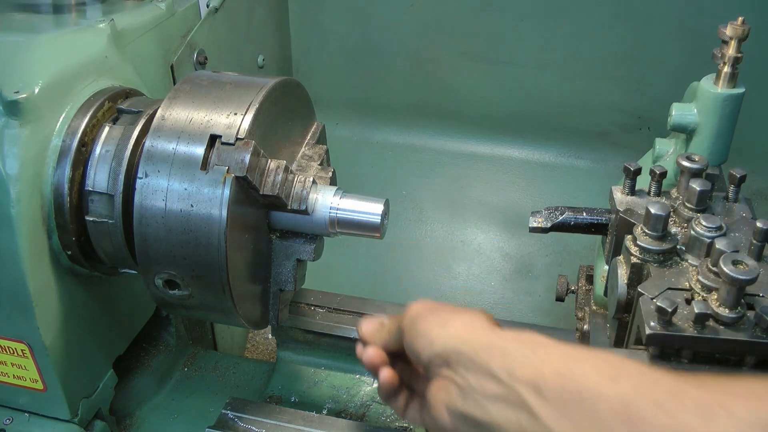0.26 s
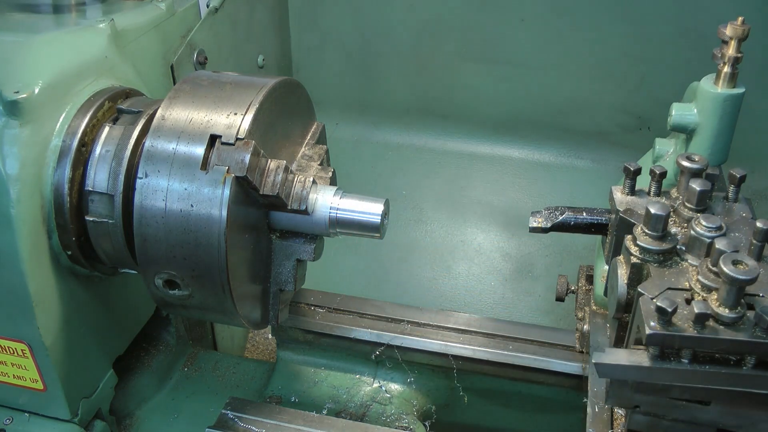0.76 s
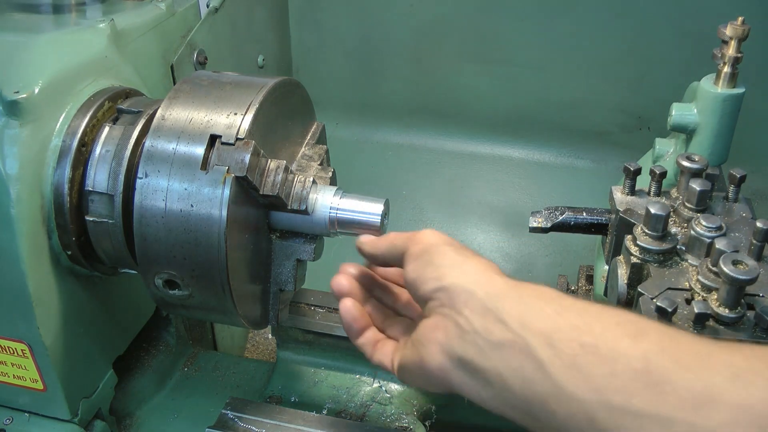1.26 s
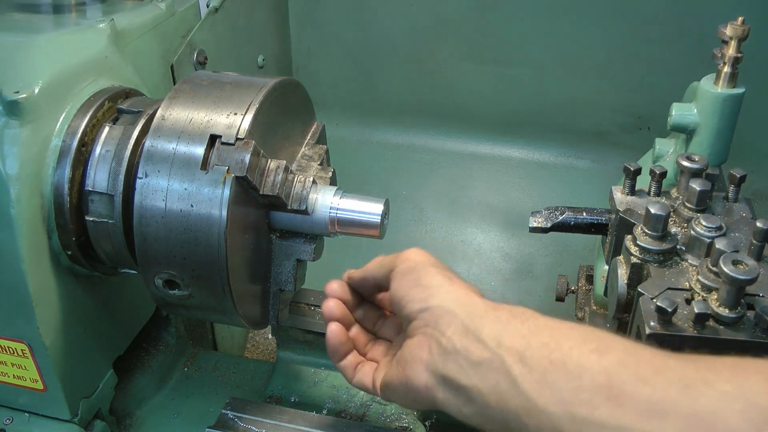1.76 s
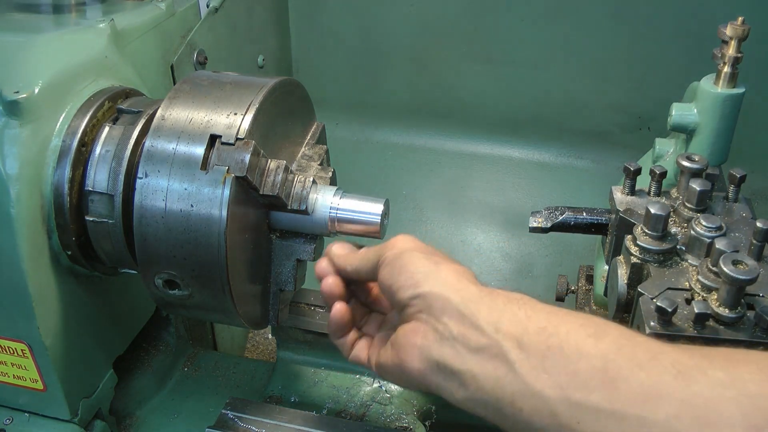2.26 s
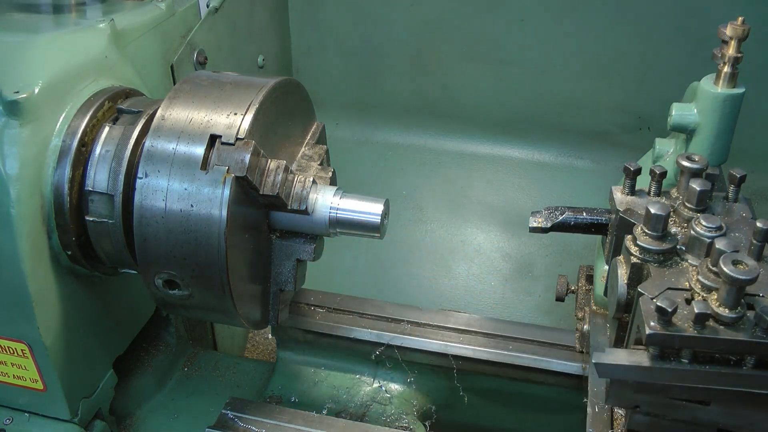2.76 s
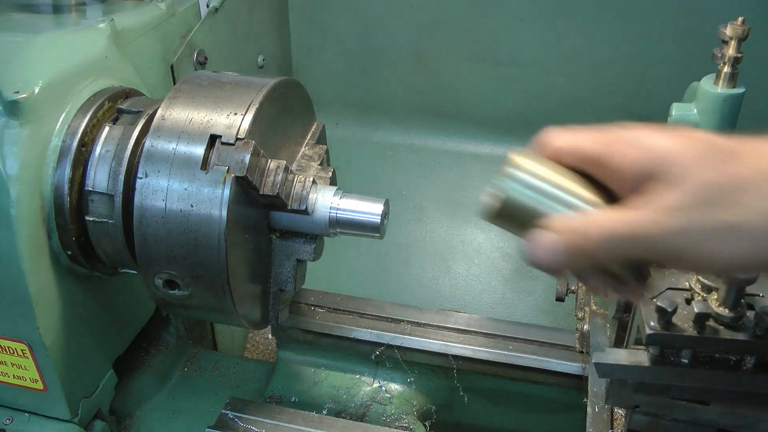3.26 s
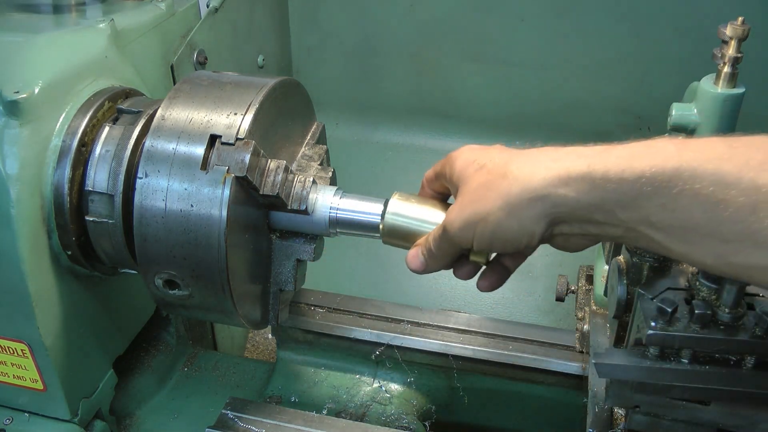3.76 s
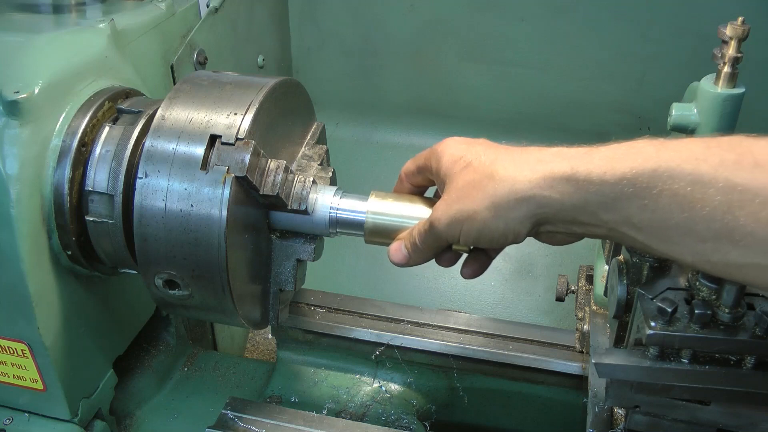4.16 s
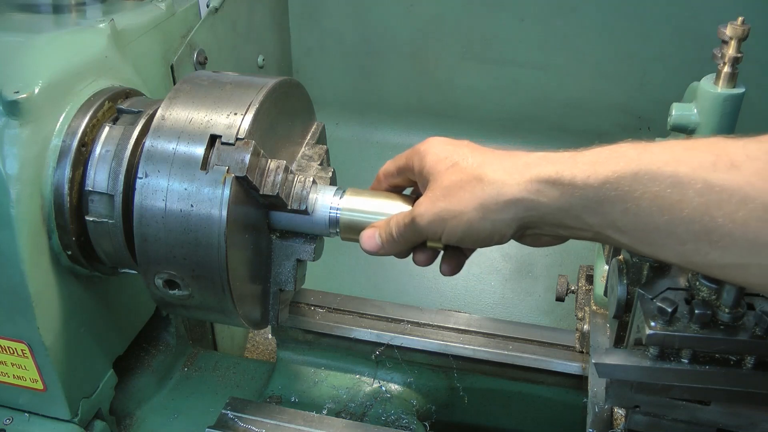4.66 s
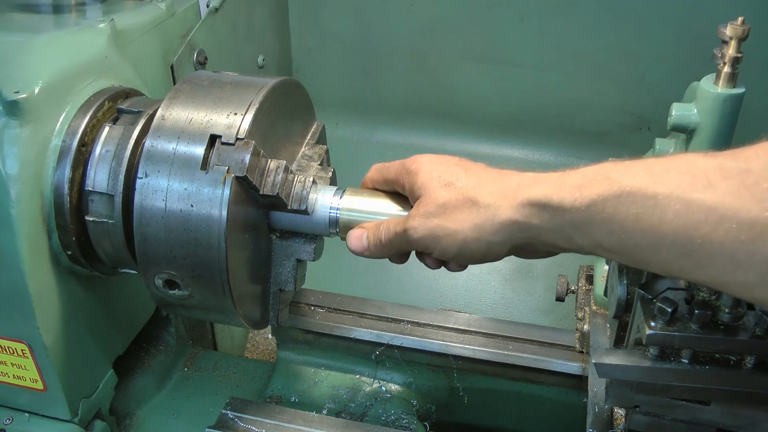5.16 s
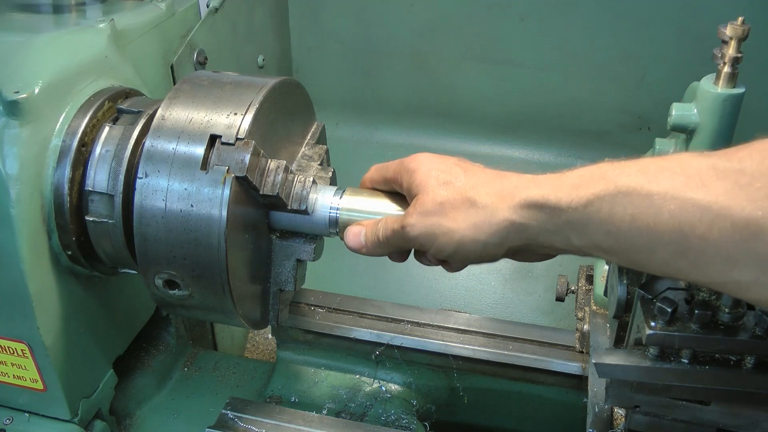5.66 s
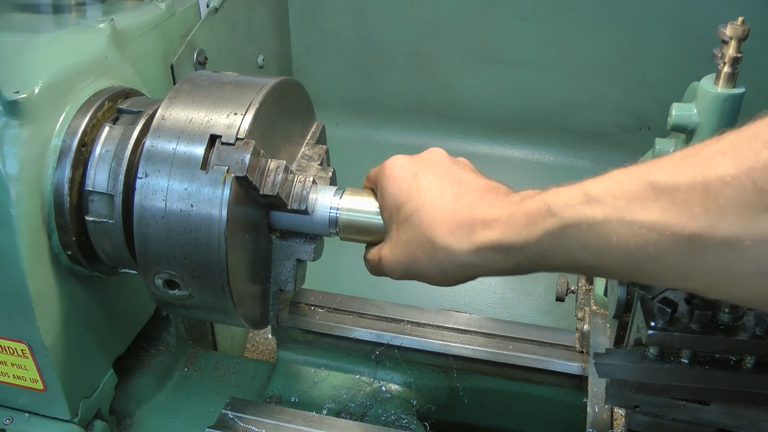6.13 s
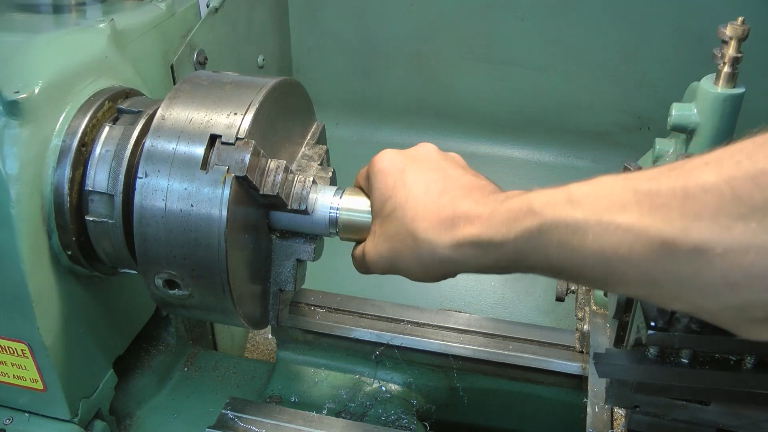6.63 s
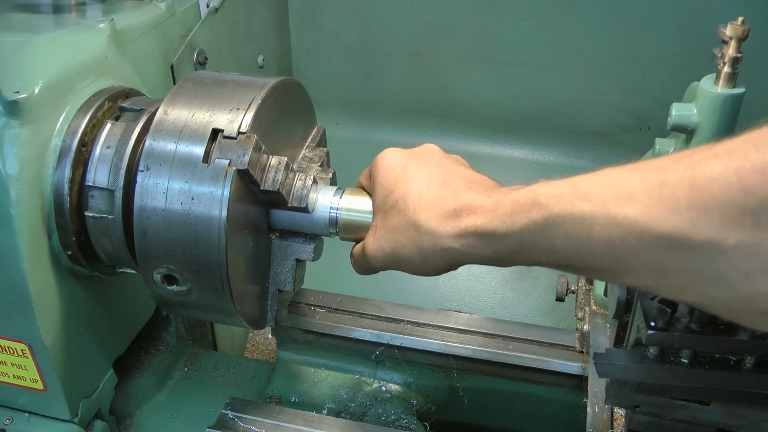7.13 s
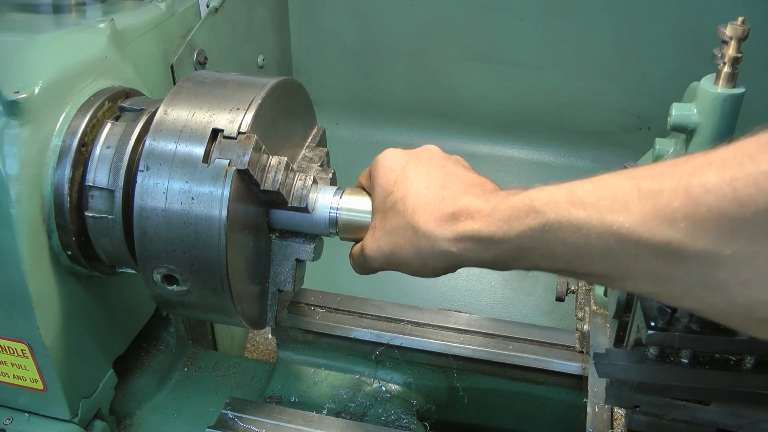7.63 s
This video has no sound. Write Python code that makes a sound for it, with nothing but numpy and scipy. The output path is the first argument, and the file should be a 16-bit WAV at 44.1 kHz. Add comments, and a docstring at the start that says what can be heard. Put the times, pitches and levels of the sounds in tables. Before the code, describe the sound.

In a small workshop with faint mains hum, a blower rushes loudly with a tonal whirr, is switched off near two seconds and sinks in pitch, leaving airy hiss. A brass sleeve then scrapes and knocks on a steel taper in a lathe chuck, is twisted with dry swishes and ticks, and snaps home with a hard clack and low thump. Close stereo microphone, brighter and louder on the right.

```python
"""Mains hum swells in under a small workshop; a blower rushes, is switched off and coasts down, leaving a hiss.
Then a brass sleeve knocks and scrapes on a steel taper held in a lathe chuck, and is twisted with swishes and
ticks. One hard clack shoves it home and thumps the lathe; small twists and ticks follow.
Coloured noise makes air and friction, decaying sines the struck metal, speed-driven harmonics the blower."""
import sys
import numpy as np
from scipy import signal
from scipy.fft import rfft, irfft, next_fast_len
from scipy.io import wavfile
from scipy.ndimage import uniform_filter1d

SR = 44100
rng = np.random.default_rng(int(sys.argv[2]) if len(sys.argv) > 2 else 0)


def dump_mix(stems):
    """Bounce the given channels to the path in sys.argv[1] as a 16-bit WAV at rate SR."""
    frames = np.atleast_2d(stems).T  # one column per channel
    limited = np.clip(frames, -1, 1)  # hard clip at full scale
    pcm = np.round(limited * 32767).astype(np.int16)
    wavfile.write(sys.argv[1], SR, pcm)


N = 348157
T = np.arange(N) / SR

# Mains hum: multiple_of_hum_hz, level_db
HUM_HARMONICS = [(1, -67), (2, -55), (3, -51.5), (4, -61)]
HUM_HZ, HUM_SWELL_S = 99.85, 1  # swell: time constant of hum and room noise
# Room noise spectrum: freq_hz, level_db_per_hz
ROOM_SPECTRUM = [(25, -11), (60, -4), (110, 2.5), (250, 2), (400, 1.5), (600, -2.5), (780, -5),
                 (980, -12.5), (1350, -10), (1800, -3), (3400, -7), (4600, -2.5), (6500, -8),
                 (10400, -11.5), (16000, -14.5)]

# Blower tones: multiple_of_shaft_hz, level_db, speed_power
BLOWER_TONES = [(1, -32, 1), (4, -20.5, 1), (11, -36, 1), (18, -13, 0.64), (20, -16, 5.5)]
# Rush of air: freq_hz, level_db_per_hz
RUSH_SPECTRUM = [(30, -11), (100, -20), (200, -13.5), (300, -7), (450, -6), (680, -2), (1000, -1),
                 (1650, -2.5), (2400, 0.5), (4500, -3.5), (7500, -9.5), (10000, -15), (12500, -26),
                 (16000, -42)]
# Duct resonances: freq_hz, width_hz, gain_db
DUCT_PEAKS = [(738, 35, 10), (833, 63, 10), (1096, 30, 9.5), (1221, 68, 9), (1410, 84, 8), (1460, 32, 8),
              (1710, 37, 5), (2340, 160, 4.5)]
# Outlet hiss: freq_hz, level_db_per_hz
JET_SPECTRUM = [(1000, -18), (2500, -6), (3300, -8.5), (3800, -4), (4450, -5.5), (5300, -7.5), (7500, -10),
                (11000, -28.5)]
# Outlet hiss against the rush: time_s, level_db
JET_LEVEL = [(0, -3.5), (1.0, -5.5), (1.6, -2), (1.92, -6.5), (2.15, -17)]
# Mount and housing, which the sinking tones pass through: freq_hz, width_hz, gain_db
HOUSING_PEAKS = [(86, 14.4, 14.5), (1295, 130, 15), (1160, 99, 8)]
# Breathy whistles in the airflow: start_s, length_s, start_hz, end_hz, half_width_hz, level_db
AIR_WHISTLES = [(0.74, 0.8, 2356, 2343, 90, -41), (1.2, 0.76, 821, 838, 22.1, -38),
                (1.45, 0.71, 1222, 1233, 30, -42.5), (1.3, 0.59, 3226, 3180, 100, -39),
                (1.36, 0.55, 4410, 4540, 300, -36), (2.315, 0.29, 3190, 3240, 115, -33),
                (2.385, 0.17, 3695, 4410, 700, -33)]
BLOWER_FULL_S, BLOWER_OFF_S, COAST_S = 0.44, 1.96, 1.58  # COAST_S: time constant of the speed
BLOWER_DB, SWELL_DB_PER_S, CREEP_DB_PER_S = -30.5, 17, 2.5
SHAFT_HZ, RUSH_SPEED_POWER = 99.6, 2.32
COAST_FLUTTER_SHARE = 0.018  # share by which the pitch flutters as the speed nears zero

# Lingering hiss: freq_hz, level_db_per_hz
HISS_SPECTRUM = [(35, -25), (110, -6), (200, -6.5), (350, 6.5), (600, -3.5), (1100, -7), (1550, -7.5),
                 (2100, 0.5), (2900, -1), (3750, 2), (4500, 2), (7400, -0.5), (9500, -9), (16000, -11)]
HISS_FULL_S, HISS_HOLD_S, HISS_ATTACK_S, HISS_T60_S, HISS_DB = 2.584, 1.16, 0.31, 3, -34.5

# Sleeve on taper: start_s, length_s, grating_db, body_db, sleeve_db
SCRAPE_PUSHES = [(3.96, 0.014, -74, -40, -58), (4.09, 0.063, -48, -40, -58), (4.17, 0.024, -42.5, -41, -59),
                 (4.235, 0.06, -46, -45, -50), (4.32, 0.033, -46, -42, -48), (4.52, .05, -46, -45, -59),
                 (4.6, 0.017, -28.5, -28, -40), (4.655, 0.085, -31, -32, -46.5),
                 (4.735, 0.022, -35, -42, -58), (5.735, 0.015, -53, -37, -80)]
# Grating noise: freq_hz, level_db_per_hz
GRATE_SPECTRUM = [(100, -22), (800, 9), (1200, -6), (1700, 8), (2200, 16), (2850, 14), (3250, 4),
                  (3900, -3), (5200, -10), (7500, -6), (10000, -33), (16000, -34)]
SCRAPE_ATTACK_S, GRATE_T60_S, RUMBLE_T60_S = 0.019, 0.066, 0.43

# Sleeve knocks: start_s, level_db, contact_pitch_hz, contact_lowpass_hz, body_db, sleeve_db
TAPER_KNOCKS = [(4.0267, -14, 2200, 2980, -10, -13.5), (4.1963, -33, 2080, 4000, -0.5, -3),
                (4.5066, -39, 1680, 3000, 6, -28), (4.5715, -26, 2950, 9000, -9, -25),
                (4.5761, -29.5, 2420, 9000, 6, -24), (4.593, -37, 1900, 6000, 8, -14),
                (4.6248, -21, 2360, 11000, -10, -5.5), (4.6315, -26.5, 2250, 9000, -2, -17),
                (4.66, -33, 2870, 7000, -12, -22), (4.6772, -35, 2370, 9000, 4, -11),
                (4.7089, -11.5, 1740, 2600, -13, -32), (4.7122, -17, 1750, 3000, -12, -26),
                (4.7229, -24, 2120, 2200, -6, -28), (4.738, -26.5, 2010, 2600, -1.5, -30)]
# Chuck, taper and sleeve together: freq_hz, level_db, t60_s
METAL_MODES = [(814, -5, 0.2), (1124, -5, 0.18), (1444, -6, 0.24), (1715, 7, 0.098), (1820, -3.5, 0.19),
               (1980, -1, 0.22), (2050, -13, 0.19), (2055, -5, 0.31), (2030, -6, 0.27), (2180, 6, 0.14),
               (2520, -14, 0.17), (2900, -3, 0.13), (2970, -6, 0.14), (3230, -11, 0.1), (3500, -12, 0.099),
               (4460, -23, 0.14)]
# Sleeve alone, damped by the fingers: freq_hz, level_db, t60_s
SLEEVE_MODES = [(6800, 8, 0.21), (6880, 7, 0.17), (7400, 1, 0.1), (7750, -6, 0.021)]
# Crack of a knock: freq_hz, level_db_per_hz
CRACK_SPECTRUM = [(60, -40), (200, -44), (780, 0), (1100, -3), (1500, 1), (1900, 13.5), (2550, 3),
                  (3000, 2.5), (4000, -0.5), (5200, -12), (7500, -2), (10000, -19), (16000, -33)]
# Lathe body noise: freq_hz, level_db_per_hz
BODY_SPECTRUM = [(50, -13), (110, -9.5), (170, -5), (270, 5), (420, 1), (520, 3.5), (760, -13.5),
                 (1000, -12.5), (3000, -32)]
# Lathe casting resonances: freq_hz, width_hz, gain_db
CASTING_PEAKS = [(159, 7.9, 16.5), (201.8, 11, 14.5), (239, 20, 6), (279, 16, 10.5), (369.5, 24, 16.5),
                 (447.7, 18, 15), (493, 14, 2), (623, 11, 14), (787, 46, 15)]
CONTACT_WIDTH_HZ, CONTACT_DB = 450, 8  # how strongly a knock favours the modes near its pitch
CLINK_DB, CLINK_T60_S = 3, 0.031

# Palm on brass: start_s, length_s, level_db
PALM_RUBS = [(5.68, 0.049, -41.5), (5.97, 0.055, -37.5), (6.1, 0.1, -41.5), (6.25, 0.075, -41.5),
             (6.42, 0.01, -45), (6.462, 0.016, -36), (6.57, 0.26, -44), (7.66, 0.27, -52.5)]
# Rubbing friction: freq_hz, level_db_per_hz
RUB_SPECTRUM = [(300, -5), (700, -4.5), (1200, -8.5), (2150, 5), (3200, 2.5), (4200, 3), (5200, 1),
                (7000, -3), (10000, -10), (16000, -11)]
# Sleeve twists: start_s, length_s, start_hz, climb_octaves, level_db
SLEEVE_TWISTS = [(4.923, .05, 6300, 0.05, -51), (4.986, 0.07, 5640, 0.35, -48.5),
                 (5.157, 0.098, 5600, 0.077, -51), (5.23, 0.082, 5500, 0.58, -47),
                 (5.383, 0.086, 5860, 0.12, -50.5), (5.486, 0.091, 5920, 0.39, -45),
                 (5.762, 0.095, 5800, 0.7, -46), (5.817, 0.17, 10280, 0.032, -54),
                 (6.035, 0.1, 5560, 0.88, -45.5), (6.13, 0.082, 10200, 0.047, -55),
                 (6.413, .04, 6400, 0.15, -46), (6.445, 0.053, 7530, 0.42, -38),
                 (6.662, .07, 7130, 0.31, -46), (6.915, 0.081, 5540, 0.098, -46),
                 (7.172, 0.097, 5640, 0.47, -50), (7.373, 0.075, 6060, 0.89, -46),
                 (7.558, 0.11, 6350, 0.46, -46.5), (7.798, 0.093, 8230, .35, -52)]
# Squeaks of brass on steel: start_s, length_s, start_hz, end_hz, half_width_hz, level_db
BRASS_SQUEAKS = [(4.335, 0.07, 1110, 1070, 40, -49.5), (5.0, 0.085, 4470, 4540, 109, -48.5),
                 (5.25, 0.1, 4450, 4650, 120, -50), (5.5, 0.1, 4650, 4500, 180, -48.5),
                 (6.438, 0.036, 2170, 2560, 220, -38), (6.445, 0.078, 4150, 4400, 130, -40),
                 (6.514, 0.024, 3750, 4450, 300, -39), (6.527, 0.033, 5250, 5900, 350, -45),
                 (6.955, 0.05, 4500, 4600, 160, -50), (7.602, 0.11, 4600, 4520, 150, -51)]
# Hollow between sleeve and palm: freq_hz, width_hz, gain_db
HOLLOW_PEAKS = [(2040, 810, -3), (2850, 360, 1.5), (4630, 320, 3.5), (6100, 630, 6.5), (6870, 500, 3),
                (10400, 510, 3.5)]
RUB_ATTACK_S, RUB_T60_S = 0.056, 0.37
GRIP_FROM_S, GRIP_DB = 3.9, -51  # faint rustle of the closed hand
TWIST_HALF_WIDTH_HZ, SIZZLE_LAG_S = 1100, 0.021
CATCHES_PER_S, CATCH_POWER_SHARE = 900, 0.26  # catches of skin in the rubbing

# Slips under the grip: start_s, level_db, low_hz, high_hz, t60_s, snap_db, body_db, ring_db
GRIP_TICKS = [(5.493, -42, 5850, 7000, .07, -30, -30, -30),
              (5.9564, -17.5, 6950, 8160, 0.0073, -28, -46, -35),
              (5.992, -30, 6940, 7900, 0.007, -26, -26, -30), (7.373, -43, 3980, 7760, 0.16, -40, -30, -30),
              (7.5003, -36, 2600, 5000, 0.011, -23, -5.5, 1.5),
              (7.659, -28.5, 1560, 3340, 0.014, -20, -30, -19),
              (7.818, -34, 1500, 3500, 0.007, -33, -14, -11),
              (7.8354, -21, 1600, 3970, 0.011, -38, -15, -4)]
# Short ring of a slip: freq_hz, level_db, t60_s
SLIP_MODES = [(3010, 6, 0.026), (3800, -15, 0.06), (740, -7.5, 0.05), (441, -8, 0.11)]

# Stutter of the seating sleeve: start_s, level_db
SEAT_HITS = [(6.7348, -33), (6.7384, -13), (6.7432, -11.5), (6.751, -26)]
# Seating clack: freq_hz, level_db_per_hz
CLACK_SPECTRUM = [(200, -24), (700, -19), (1200, -14), (2200, 0), (3200, -1.5), (4500, 2), (6000, -1.5),
                  (8300, -0.5), (10500, -8.5), (14000, -12), (16000, -24)]
# Lathe bed thumps: start_s, rumble_db, ring_db
BED_THUMPS = [(6.7381, -24, -21.5), (6.808, -32.5, -46)]
# Thump noise: freq_hz, level_db_per_hz
THUMP_SPECTRUM = [(30, -26), (55, -16), (85, 6), (170, 2.5), (260, 10.5), (340, 4), (420, -3), (570, -2),
                  (1000, -5.5), (3000, -28)]
# Low modes of the lathe bed: freq_hz, level_db, t60_s
BED_MODES = [(87.7, 0, 0.52), (133.3, -7, 0.54), (176, -7, 0.65), (213.5, -8, 0.35), (240.5, 6, 0.46),
             (294, 2, 0.26), (358, 10, 0.2), (577, 3.5, 0.27), (595, -10, 0.25)]
# Deep shudder after the shove: start_s, length_s, start_hz, end_hz, half_width_hz, level_db
BED_SHUDDER = [(6.86, 0.18, 125, 115, 22, -52.5), (7.03, 0.23, 60, 56, 10, -56)]

# Shaded left port, late in the bass: freq_hz, gain_db, phase_lag_rad
LEFT_PORT_RESPONSE = [(59.6, 0, 0.85), (156, 1, 0.62), (386, -6, 1.66), (1140, -6, 0.76),
                      (2570, -8.5, 0.92), (6200, -9, 0), (14000, -11, 0)]
TOP_HZ = 15900


def amp(db):
    """Decibels to gain."""
    return 10 ** (np.asarray(db) / 20)


def unit(x):
    """Scale to rms 1."""
    return x / np.sqrt(np.mean(x ** 2))


def curve(rows):
    """Join (time_s, value) points by straight lines."""
    return np.interp(T, *np.array(rows).T)


def on_bins(points, f_hz, axis=1):
    """Interpolate one table column on a log-frequency axis."""
    points = np.array(points)
    return np.interp(np.log(f_hz + 1), np.log(points[:, 0]), points[:, axis])


def resonances(f_hz, peaks):
    """Summed gain in dB of (freq_hz, width_hz, gain_db) peaks."""
    return sum(db / (1 + (2 * (f_hz - hz) / width_hz) ** 2) for hz, width_hz, db in peaks)


def colour(x, points, peaks=()):
    """Filter by a smooth spectrum with resonances on top."""
    n = x.shape[-1]
    size = next_fast_len(n)
    f_hz = np.fft.rfftfreq(size, 1 / SR)
    gain_db = on_bins(points, f_hz) + resonances(f_hz, peaks)
    return irfft(rfft(x, size) * amp(gain_db), size)[..., :n]


def air(n, likeness):
    """White noise at two ports; likeness is the shared share of its power."""
    shared = rng.standard_normal(n)
    return np.sqrt(likeness) * shared + np.sqrt(1 - likeness) * rng.standard_normal((2, n))


def walk(rate_hz):
    """Random drift: normal draws at a rate, joined by straight lines."""
    return np.interp(T * rate_hz, np.arange(2048), rng.standard_normal(2048))


def fade(t, t60_s):
    """Exponential decay by 60 dB in t60_s."""
    return np.exp(-np.log(1000) * t / t60_s)


def stroke(s, hold_s, attack_s, t60_s):
    """Envelope that swells to 1 at time s, holds, then dies away."""
    swell = np.exp(-(np.maximum(s - T, 0) / attack_s) ** 2)
    return swell * fade(np.maximum(T - s - hold_s, 0), t60_s)


def strokes(rows, axis, attack_s, t60_s):
    """Joint envelope of (start_s, length_s, ..) rows at the dB of one column; powers add."""
    power = sum((amp(row[axis]) * stroke(row[0], row[1], attack_s, t60_s)) ** 2 for row in rows)
    return np.sqrt(power + 1e-18)


def add(out, s, x):
    """Mix x into out at time s."""
    i = int(s * SR)
    out[:, i:i + x.shape[1]] += x[:, :N - i]


def burst(points, t60_s, room_db, room_t60_s, likeness, peaks=()):
    """Dense short resonances as fast-dying noise, plus the room's longer, wider tail."""
    t = T[:SR]
    direct = unit(colour(air(SR, likeness), points, peaks)) * fade(t, t60_s)
    tail = unit(colour(air(SR, likeness / 2), points, peaks)) * fade(t, room_t60_s)
    return direct + amp(room_db) * tail


def ring(modes, spread_rad):
    """Decaying sines; each mode reaches the two ports with its own phase."""
    t, out = T[:SR], 0
    for hz, db, t60_s in modes:
        phase = spread_rad * rng.standard_normal((2, 1))
        out = out + amp(db) * np.sin(2 * np.pi * hz * t + phase) * fade(t, t60_s)
    return out / np.sqrt(sum(amp(mode[1]) ** 2 for mode in modes))


def glides(rows, likeness, rise):
    """Noise bands whose centre slides while they swell and fade: low-pass noise shifted up in pitch."""
    out = np.zeros((2, N))
    for s, length_s, start_hz, end_hz, half_width_hz, db in rows:
        u = np.linspace(0, 1, int(length_s * SR))
        lowpass = signal.butter(2, half_width_hz, fs=SR, output="sos")
        wobble = signal.sosfilt(lowpass, air(SR, likeness) + 1j * air(SR, likeness))[:, -len(u):]
        phase = 2 * np.pi * np.cumsum(start_hz * (end_hz / start_hz) ** u) / SR
        band = unit((wobble * np.exp(1j * phase)).real)
        add(out, s, amp(db) * band * np.sin(np.pi * u ** rise))
    return out


def nearby(x, db):
    """Reflections off chuck, bed and splash guard comb a sound, differently at each port."""
    t = T[:SR // 25]
    echoes = rng.standard_normal((2, len(t))) * fade(t, 0.085) * (t > .001)
    echoes *= amp(db) / np.sqrt(np.sum(echoes ** 2) / 2)
    reflected = signal.fftconvolve(x, echoes, axes=1)[:, :N]
    return (x + reflected) / np.sqrt(1 + amp(db) ** 2)


def workshop():
    """Mains hum as wavering harmonics over faint room noise, both swelling in."""
    hum = 0
    for k, db in HUM_HARMONICS:
        level = amp(db + 1.1 * walk(7.6)) * np.sqrt(2)
        hum = hum + level * np.sin(2 * np.pi * (k * HUM_HZ * T + rng.random()) + 0.15 * walk(3.1))
    room = nearby(unit(colour(air(N, 0.45), ROOM_SPECTRUM)), db=6.0) * amp(-45.5 + walk(1.25))
    return (hum + room) * amp(-3.0) * (1 - np.exp(-T / HUM_SWELL_S))


def hiss():
    """Wide, airy noise, stronger to the right, that swells once and dies away."""
    peaks = [(270, 17, 6.0), (425.0, 30, 4.9), (4600, 650, 3.7)]
    noise = unit(colour(air(N, 0.013), HISS_SPECTRUM, peaks))
    swell = stroke(HISS_FULL_S, HISS_HOLD_S, HISS_ATTACK_S, HISS_T60_S)
    return nearby(noise, db=-5.5) * swell * amp(HISS_DB + 1.0 * walk(11)) * amp([[-1], [2]])


def blower():
    """Air rushes through a resonant duct and hisses at the outlet; tones and rush sink as the shaft coasts."""
    speed = np.exp(-np.maximum(T - BLOWER_OFF_S, 0) / COAST_S)
    drive_db = BLOWER_DB - SWELL_DB_PER_S * np.maximum(BLOWER_FULL_S - T, 0)
    drive_db = drive_db - CREEP_DB_PER_S * np.maximum(BLOWER_OFF_S - T, 0)
    flow = amp(drive_db) * speed ** RUSH_SPEED_POWER

    duct = unit(colour(air(N, 0.84), RUSH_SPECTRUM, DUCT_PEAKS))
    jet = unit(colour(air(N, 0.25), JET_SPECTRUM)) * amp(curve(JET_LEVEL))
    rush = nearby(duct + jet, db=-9) * amp(1.5 + 0.28 * walk(24))

    flutter = 0.00083 * walk(12.0) + COAST_FLUTTER_SHARE * np.sqrt(1 - speed) * walk(60)
    shaft_hz = SHAFT_HZ * speed * (1 + flutter)
    turn = 2 * np.pi * np.cumsum(shaft_hz) / SR
    whirr = 0
    for k, db, power in BLOWER_TONES:
        housing_db = resonances(k * shaft_hz, HOUSING_PEAKS)
        whirr = whirr + amp(db + housing_db + 3.9 * walk(28)) * speed ** power * np.sin(k * turn)
    whistles = glides(AIR_WHISTLES, likeness=0.16, rise=0.49) * amp([[-3], [1]])
    return (rush + whirr) * flow + whistles


def slide():
    """Tiny catches of brass on steel excite the metal's modes, while the lathe body rumbles."""
    catches = unit((rng.random(N) < 600 / SR) * rng.standard_normal(N))

    def excite(h, force):
        """Play the catches into one set of resonances, scaled to unit energy."""
        return signal.fftconvolve((catches * force)[None], h / np.sqrt(np.sum(h ** 2) / 2), axes=1)[:, :N]

    grip = strokes(SCRAPE_PUSHES, axis=2, attack_s=SCRAPE_ATTACK_S, t60_s=GRATE_T60_S) * amp(2.0 * walk(110))
    rumble = strokes(SCRAPE_PUSHES, axis=3, attack_s=SCRAPE_ATTACK_S, t60_s=RUMBLE_T60_S)
    sing = strokes(SCRAPE_PUSHES, axis=4, attack_s=SCRAPE_ATTACK_S, t60_s=GRATE_T60_S)
    grate = burst(GRATE_SPECTRUM, t60_s=0.02, room_db=-7.0, room_t60_s=0.11, likeness=0.36)
    grating = excite(grate, grip)
    metal = excite(ring(METAL_MODES, spread_rad=0.45), grip * amp(-6.5))
    sleeve = excite(ring(SLEEVE_MODES, spread_rad=1.0), sing)
    body = unit(colour(air(N, 1.0), BODY_SPECTRUM, CASTING_PEAKS)) * rumble * amp([[-1.5], [1]])
    return grating + metal + sleeve + body


def knocks():
    """Each knock clinks, cracks, rings modes near its contact pitch and sets the lathe body booming a little later."""
    out, t = np.zeros((2, N)), T[:SR]
    for s, db, pitch_hz, soft_hz, body_db, sleeve_db in TAPER_KNOCKS:
        contact = signal.butter(1, soft_hz, fs=SR)  # a softer contact dulls the blow
        favoured = [(pitch_hz, CONTACT_WIDTH_HZ, CONTACT_DB)]
        clink = amp(CLINK_DB) * ring([(pitch_hz, 0, CLINK_T60_S)], spread_rad=0.26)
        crack = burst(CRACK_SPECTRUM, t60_s=0.043, room_db=-5.5, room_t60_s=0.21, likeness=0.83,
                      peaks=favoured)
        modes = [(hz, mode_db + resonances(hz, favoured), t60_s) for hz, mode_db, t60_s in METAL_MODES]
        metal = ring(modes, spread_rad=1.4)
        blow = clink + amp(1.0) * crack + amp(-2.0) * metal
        add(out, s, amp(db) * signal.lfilter(*contact, blow))
        add(out, s, amp(db + sleeve_db) * ring(SLEEVE_MODES, spread_rad=0.8))
        body = unit(colour(air(SR, 0.81), BODY_SPECTRUM, CASTING_PEAKS))
        body = body * fade(t, 0.34) * (1 - fade(t, 0.1))
        add(out, s, amp(db + body_db) * body * amp([[-1.5], [1]]))
    # the knocks are kept out of the deep bass
    return signal.sosfilt(signal.butter(2, 115, "highpass", fs=SR, output="sos"), out)


def twisting():
    """The gripped sleeve rubs, squeaks and swishes upward; the hollow of the hand colours rub and swish."""
    resting = amp(GRIP_DB) * stroke(GRIP_FROM_S, T[-1], RUB_ATTACK_S, RUB_T60_S)
    pressure = np.hypot(resting, strokes(PALM_RUBS, axis=2, attack_s=RUB_ATTACK_S, t60_s=RUB_T60_S))
    catches = unit((rng.random(N) < CATCHES_PER_S / SR) * rng.uniform(-1.27, 1, N))
    smooth = air(N, 0.19)
    friction = np.sqrt(CATCH_POWER_SHARE) * catches + np.sqrt(1 - CATCH_POWER_SHARE) * smooth
    rub = unit(colour(friction, RUB_SPECTRUM)) * pressure * amp(1.96 * walk(90))

    rising = [(s, length_s, hz, hz * 2 ** climb_octaves, TWIST_HALF_WIDTH_HZ, db)
              for s, length_s, hz, climb_octaves, db in SLEEVE_TWISTS]
    swish = glides(rising, likeness=0.95, rise=0.58)
    squeak = glides(BRASS_SQUEAKS, likeness=0.81, rise=0.87)

    # a fine sizzle at the very top follows each swish
    swish_level = np.sqrt(np.abs(uniform_filter1d(swish[1] ** 2, size=800)))
    effort = np.interp(T - SIZZLE_LAG_S, T, swish_level)
    sizzle = unit(colour(air(N, .3), [(4000, -31), (9000, -8), (12500, -12), (14500, -4)]))
    sizzle = sizzle * effort * amp(-0.5)
    hand = [(500, -1.5), (3000, -3.0), (6000, -3.5), (12000, 0)]
    return nearby(colour(rub + swish + sizzle, hand, HOLLOW_PEAKS), db=-2) + squeak


def ticks():
    """The sleeve slips by a hair: a dry band-limited tick, a broad snap, a short ring and a lathe thud."""
    out, t = np.zeros((2, N)), T[:SR]
    for s, db, low_hz, high_hz, t60_s, snap_db, body_db, ring_db in GRIP_TICKS:
        band = signal.butter(5, [low_hz, high_hz], "bandpass", fs=SR, output="sos")
        push = air(SR, 0.23) * (fade(t, t60_s) + amp(-25) * fade(t, 0.31))
        tick = signal.sosfilt(band, push) * np.sqrt(SR / 2 / (high_hz - low_hz))
        snap = amp(snap_db) * colour(push, [(300, -34), (1500, 11.0), (12000, 18.0), (16000, 10)])
        thud = unit(colour(air(SR, 0.86), [(100, -3), (400, 15), (750, -22), (1200, -4), (3000, -34)]))
        thud = amp(body_db) * thud * fade(t, 0.11)
        slip_ring = amp(ring_db) * ring(SLIP_MODES, spread_rad=0.36)
        add(out, s, amp(db) * (tick + snap + thud + slip_ring) * amp([[-2], [1.5]]))
    return out


def seating():
    """The taper grabs: a bright stuttering clack, ringing thumps of the lathe bed and a deep shudder."""
    out, t = np.zeros((2, N)), T[:SR]
    for s, db in SEAT_HITS:
        clack = burst(CLACK_SPECTRUM, t60_s=0.039, room_db=-5.0, room_t60_s=0.18, likeness=0.61)
        add(out, s, amp(db) * clack)
    out = nearby(out, db=-11)
    for s, rumble_db, ring_db in BED_THUMPS:
        rumble = unit(colour(air(SR, 0.99), THUMP_SPECTRUM)) * fade(t, 0.28)
        thump = amp(rumble_db) * rumble + amp(ring_db) * ring(BED_MODES, spread_rad=0.4)
        # the heavy bed takes a moment to get moving
        add(out, s, thump * (1 - fade(t, 0.024)))
    return out + glides(BED_SHUDDER, likeness=1.0, rise=0.9)


def scene():
    """Sum of all sources at the two ports."""
    return workshop() + hiss() + blower() + slide() + knocks() + twisting() + ticks() + seating()


def record(dry):
    """Two ports: the left is shaded; both round the highest peaks and cut the top."""
    size = next_fast_len(N + SR // 4)
    f_hz = np.fft.rfftfreq(size, 1 / SR)
    lag_rad = on_bins(LEFT_PORT_RESPONSE, f_hz, axis=2)
    shade = amp(on_bins(LEFT_PORT_RESPONSE, f_hz)) * np.exp(-1j * lag_rad)
    left = irfft(rfft(dry[0], size) * shade, size)[:N]
    heard = amp(3.0) * np.array([left, dry[1]])
    rounded = heard / (1 + (heard / .85) ** 4) ** .25
    return signal.sosfilt(signal.ellip(10, .2, 80, TOP_HZ, fs=SR, output="sos"), rounded)


dry = scene()
out = record(dry)
dump_mix(out)
```